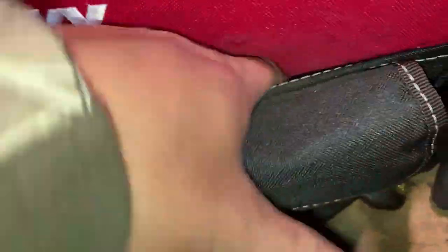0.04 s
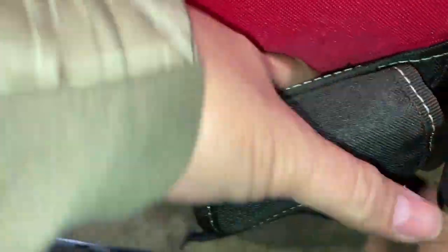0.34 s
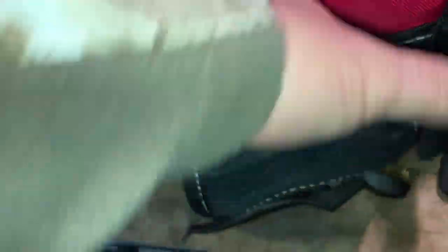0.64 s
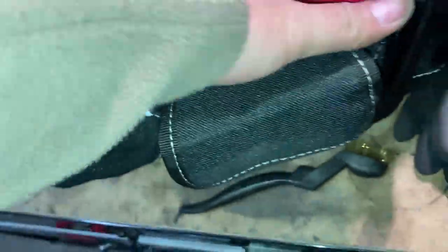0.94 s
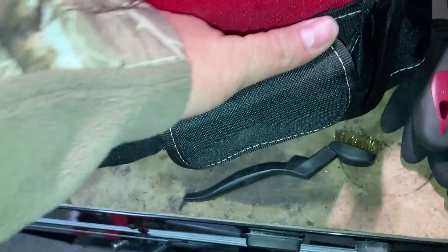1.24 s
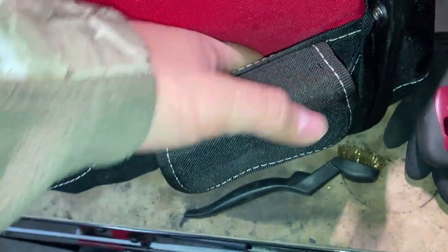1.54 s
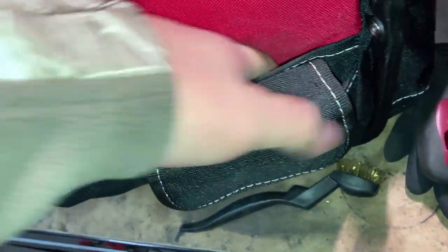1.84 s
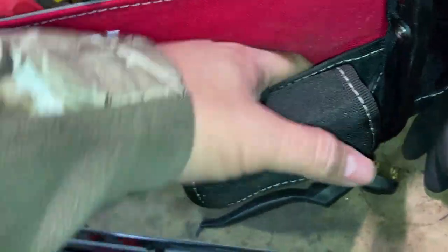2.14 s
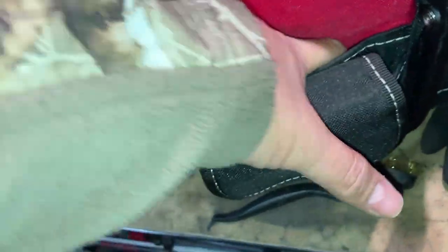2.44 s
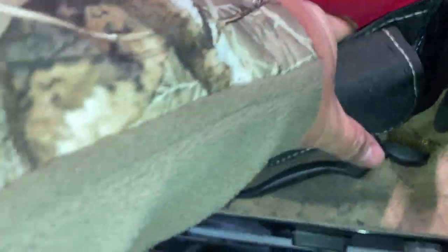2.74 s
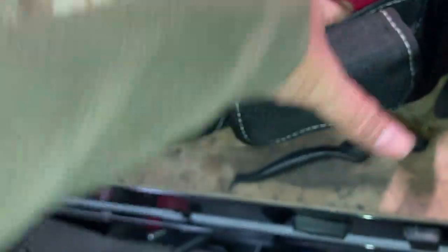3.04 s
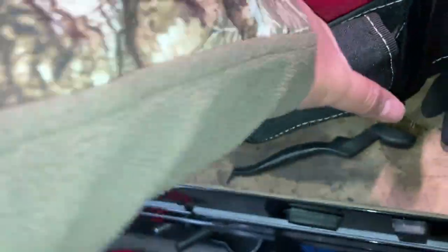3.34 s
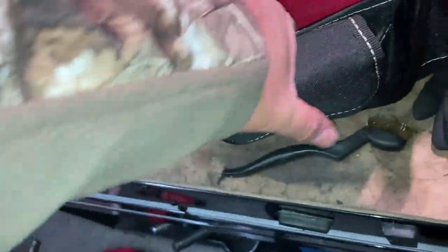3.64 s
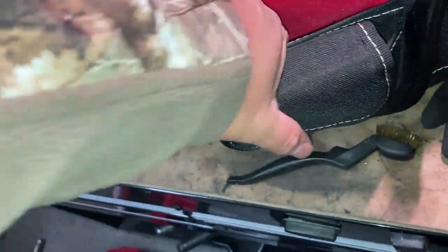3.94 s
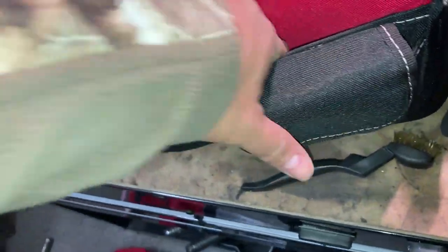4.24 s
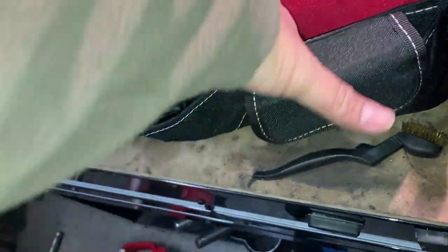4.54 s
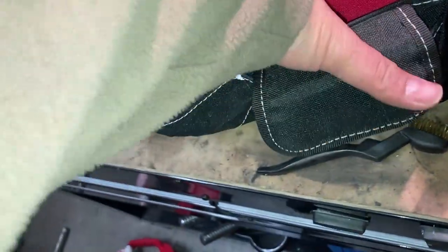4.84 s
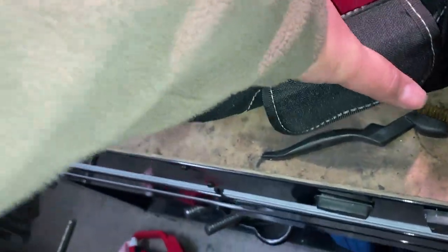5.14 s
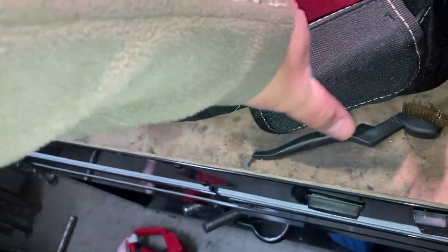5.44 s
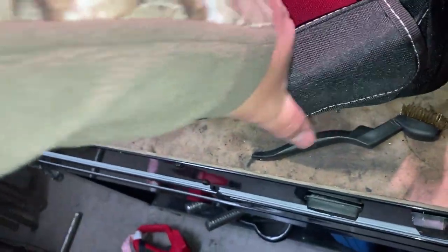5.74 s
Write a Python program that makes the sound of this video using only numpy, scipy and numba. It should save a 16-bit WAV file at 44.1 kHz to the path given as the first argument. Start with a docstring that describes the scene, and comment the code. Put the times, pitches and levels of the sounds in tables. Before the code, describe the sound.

In a quiet workshop, a hand rummages through the pocket of a stiff fabric tool bag, right by the microphone. Sleeve and fingers slide over the weave in uneven strokes, hissing and crumpling, while the pocket wall bumps softly. Tools tick faintly at first. Past the middle a handle creaks briefly, then comes a louder bump with muffled clacks and one sharp metal tick as the rustling carries on.

```python
"""A quiet workshop, close up on a stiff fabric tool bag, heard through a phone's two microphone ports.
A hand rummages in the pocket: sleeve and fingers slide over the weave, whose threads catch and hiss,
folds crumple and buckle, and the pocket wall flaps and bumps. The tools packed inside tick and clack
against each other, damped by the cloth, and once a handle creaks along the fabric."""
import sys
import numpy as np
from scipy import signal
from scipy.fft import rfft, irfft
from scipy.io import wavfile
from scipy.ndimage import uniform_filter1d
from numba import njit

SR = 44100
rng = np.random.default_rng(int(sys.argv[2]) if len(sys.argv) > 2 else 0)


def to_wav(s):
    """Save 16-bit WAV."""
    ch = np.atleast_2d(s).T  # columns
    pcm = np.round(np.clip(ch, -1, 1) * 32767)  # PCM
    wavfile.write(sys.argv[1], SR, pcm.astype(np.int16))


N = 255156
TIME = np.arange(N) / SR
FREQ = np.arange(N // 2 + 1) * SR / N


def undb(db):
    """Decibels to gain."""
    return 10 ** (np.asarray(db) / 20)


def unit(x):
    """Scale to an rms of 1."""
    return x / np.sqrt(np.mean(x ** 2))


def colour(x, points):
    """Filter by a spectrum of (freq_hz, level_db) points."""
    hz, db = np.transpose(points)
    return irfft(rfft(x) * undb(np.interp(np.log(FREQ + 1), np.log(hz), db)), N)


def around(x, hz, octaves):
    """Keep a soft band of the given half width around a frequency."""
    f = np.arange(len(x) // 2 + 1) * SR / len(x) + 1
    return irfft(rfft(x) / (1 + (np.log2(f / hz) / octaves) ** 4), len(x))


def wander(rate_hz):
    """Slow random drift with a spread near 1."""
    steps = rng.standard_normal(4096)
    return 1.2 * np.interp(TIME * rate_hz, np.arange(len(steps)), steps)


def add(track, start_s, sound):
    """Mix a short sound into a track."""
    start = max(int(start_s * SR), 0)
    track[start:start + len(sound)] += sound[:N - start]


@njit
def resonate(x, hz, width_hz):
    """Band-pass whose centre may move, gain 1 at the centre."""
    y, band_state, low_state = np.empty(len(x)), 0., 0.
    for i in range(len(x)):
        g, damping = np.tan(np.pi * hz[i] / SR), width_hz / hz[i]
        band = (band_state + g * (x[i] - low_state)) / (1 + g * (g + damping))
        band_state, low_state = 2 * band - band_state, low_state + 2 * g * band
        y[i] = damping * band
    return y


def workshop_air(level_db):
    """Room tone behind the bag: still air, a faint low rush."""
    spectrum_hz_db = [(25, -4), (55, 16), (150, 7), (500, -9), (16000, -74)]
    return unit(colour(rng.standard_normal(N), spectrum_hz_db)) * undb(level_db)


def bag_echoes(x, t60_s, level_db):
    """Bag and sleeve, right by the microphone, scatter a different short tail to each port."""
    t = TIME[:16384]
    tails = rng.standard_normal((2, len(t))) * np.exp(-np.log(1000) * t / t60_s)
    tails = tails / np.sqrt(np.sum(tails ** 2, axis=1, keepdims=True))
    return undb(level_db) * signal.fftconvolve(x[None], tails, axes=1)[:, :N]


# Phase of the left microphone port ahead of the right: freq_hz, lead_rad
PORT_PHASE = [(0, 0), (300, -.4), (700, -2.2), (1050, -3), (1400, -3), (2100, -4.1), (3300, -3.7),
              (5300, -np.pi), (8400, 0), (15000, 2 * np.pi), (22050, 13)]


def microphone_ports(x):
    """The sound reaches the two ports out of step."""
    lead = np.interp(FREQ, *np.transpose(PORT_PHASE))
    return np.array([x, irfft(rfft(x) * np.exp(-1j * lead), N)])


# Modes of a struck or scraped tool handle: pitch_hz, level_db
HANDLE_RESONANCES = [(678, -14), (810, -9), (1335, 4.5), (1540, -1), (1940, 3.5), (2220, -4.5),
                     (2540, -3.5), (2850, -1), (3450, -10)]


def handle_ring(centre_hz, t60_s, octaves):
    """The spot touched on a handle picks the modes, and the cloth chokes them."""
    ring, t = 0, TIME[:4096]
    for hz, mode_db in HANDLE_RESONANCES:
        detune, phase = rng.standard_normal(2)
        size = undb(mode_db) / (1 + (np.log2(hz / centre_hz) / octaves) ** 2)
        ring = ring + size * np.sin(2 * np.pi * (hz * (1 + .008 * detune) * t + phase))
    return ring * np.exp(-np.log(1000) * t / t60_s)


def handle_creak(peak_s, pitch_hz, swell_s, release_s, jitter, overtone_db, level_db):
    """A handle judders along the cloth: nearly regular stick and slip that builds and breaks off."""
    phase = 2 * np.pi * np.cumsum(pitch_hz * (1 + jitter * wander(250))) / SR
    judder = sum(undb(overtone_db * k) * np.sin((k + 1) * phase) for k in range(3))
    flank_s = np.where(TIME < peak_s, swell_s, release_s)
    return unit(judder) * np.exp(-((TIME - peak_s) / flank_s) ** 2) * undb(level_db)


# Handles meeting inside the pocket: start_s, relative_db, centre_hz, t60_s
HANDLE_KNOCKS = [(2.7085, -36, 690, 0.042), (2.7138, -41.5, 1300, 0.073), (2.722, -36.5, 676, 0.046),
                 (3.601, -34.5, 810, 0.062), (3.829, -33.5, 2000, 0.037), (4.1215, -29, 2370, 0.03),
                 (4.1235, -27.5, 690, 0.054), (4.1362, -22.5, 2360, 0.012), (4.226, -31, 1910, 0.07),
                 (4.2275, -41, 750, 0.026), (4.7508, -21.5, 2500, 0.0084), (4.753, -25, 725, 0.01),
                 (5.3846, -36, 3030, 0.025)]


def handle_clacks(crack_db, crack_s, gain_db):
    """Handles knock together: a dry crack, then a short ring."""
    out, t = np.zeros(N), TIME[:4096]
    for start_s, db, centre_hz, t60_s in HANDLE_KNOCKS:
        ring = handle_ring(centre_hz, t60_s, octaves=0.24)
        decay_energy = np.sum(np.exp(-2 * np.log(1000) * t / t60_s))
        ring = ring / np.sqrt(np.sum(ring ** 2) / decay_energy)
        crack = unit(around(rng.standard_normal(len(t)), centre_hz, 0.84)) * np.exp(-t / crack_s)
        add(out, start_s, (ring + undb(crack_db) * crack) * undb(db + gain_db))
    return signal.sosfilt(signal.butter(2, 400, "highpass", fs=SR, output="sos"), out)


# Brief ring of a tool wrapped in cloth: pitch_hz, level_db, t60_s
METAL_MODES = [(3170, 1, 0.008), (7240, 6.5, 0.0048), (9300, 20.5, 0.0013), (10500, 12, 0.0019),
               (14800, -6, 0.0018)]
# Tools and buckles touching, close by: start_s, relative_db, treble_tilt_db, contact_s
METAL_CONTACTS = [(1.0251, -28.5, 2, 0.00076), (1.4201, -30.5, -14, .0011), (1.954, -37, -18, .0008),
                  (2.919, -41, 10, .003), (4.1362, -23.5, -24, .0008), (4.751, -10.5, 3, 0.0002),
                  (4.751, -29, 3, 0.00024), (5.3826, -32, -24, 0.001), (5.384, -34, -20, 0.00071),
                  (5.5, -38, -22, .001)]


def metal_ticks(crack_hz, crack_db, gain_db):
    """Metal grates on metal for an instant and rings the damped modes of a tool."""
    out, t = np.zeros(N), TIME[:2048]
    for start_s, db, treble_tilt_db, contact_s in METAL_CONTACTS:
        ring = 0
        for hz, mode_db, t60_s in METAL_MODES:
            detuned_hz = hz * (1 + .015 * rng.standard_normal())
            size = undb(mode_db + treble_tilt_db * hz / (hz + 3500))
            ring = ring + size * np.sin(2 * np.pi * detuned_hz * t) * np.exp(-np.log(1000) * t / t60_s)
        crack = unit(around(rng.standard_normal(len(t)), crack_hz, 1.4)) * np.exp(-t / contact_s)
        onset_rms = np.sqrt(np.mean(ring[:30] ** 2))
        add(out, start_s, (ring / onset_rms + undb(crack_db) * crack) * undb(db + gain_db))
    return out


# Quick scrapes of a fold or seam: peak_s, level_db, half_length_s, centre_hz
SEAM_SCRAPES = [(0.862, -41.5, 0.027, 6440), (1.1544, -38, 0.0022, 7885), (1.156, -39.5, 0.0028, 1890),
                (1.324, -41.5, 0.0057, 9050), (1.325, -36.5, 0.0044, 1820), (1.59, -35.5, 0.0059, 1310),
                (1.591, -39.5, 0.01, 9500), (2.7035, -34.5, 0.0032, 2730), (2.7056, -32, 0.0024, 9000),
                (3.2, -42, 0.014, 1950), (3.207, -43, 0.028, 500), (3.274, -38, 0.0087, 2460),
                (3.612, -39, 0.017, 1950), (3.848, -46, 0.021, 645), (4.005, -38, 0.0072, 1150),
                (4.124, -34.5, 0.012, 2250)]


def seam_scuffs(ring_db, ring_t60_s):
    """A fold drags over a seam or a handle: a short swell of gritty slips that make the handle ring."""
    out, t = np.zeros(N), TIME[:4096] - 2048 / SR
    for peak_s, db, half_s, hz in SEAM_SCRAPES:
        grit = rng.laplace(size=len(t)) * np.exp(-(t / half_s) ** 2)
        ring = signal.fftconvolve(grit, handle_ring(hz, ring_t60_s, octaves=.25))[:len(t)]
        scrape = around(grit, hz, octaves=0.78) + undb(ring_db) * ring
        scrape_rms = np.sqrt(np.sum(scrape ** 2) / (half_s * SR))
        add(out, peak_s + t[0], scrape / scrape_rms * undb(db))
    return out


# Resonances of the hollow bag: pitch_hz, width_hz, level_db
BAG_RESONANCES = [(87.5, 50, 5), (137.5, 44, 8), (179.6, 25, 3.5), (253.6, 58, 6.5), (334, 95, 3.5),
                  (386, 31, 0.5), (493, 97, -5), (805, 204, 13)]
# The pocket wall, knocked or snapping back near the microphone: start_s, relative_db, pitch_hz
WALL_THUDS = [(0.045, -39, 251), (0.594, -36.5, 295), (0.893, -36.5, 195), (0.917, -40.5, 159),
              (1.162, -43, 286), (1.272, -35, 225), (1.326, -40, 320), (1.861, -41, 228), (2.005, -40, 206),
              (2.052, -34, 253), (2.075, -38, 226), (2.394, -39.5, 350), (2.715, -28, 275),
              (2.723, -38, 370), (2.74, -38.5, 164), (2.79, -48.5, 240), (2.889, -50, 211),
              (3.297, -39.5, 450), (3.417, -39, 394), (3.516, -45.5, 320), (3.606, -31.5, 320),
              (4.033, -34, 316), (4.1241, -23, 250), (4.1296, -22.5, 200), (4.14, -25, 293),
              (4.178, -40, 340), (4.222, -30.5, 440), (4.23, -26.5, 385), (4.8, -34.5, 303),
              (4.807, -34.5, 243), (5.321, -48.5, 110), (5.502, -34, 358), (5.561, -42, 163)]


def wall_bumps(contact_cycles, buckle_db, buckle_s, settle_db, settle_s, gain_db):
    """A soft blow rings the hollow bag; the wall buckles after it and rolls on as it settles."""
    out, t, lead_in = np.zeros(N), TIME[:8192], 512
    bag = sum(undb(db) * width * np.exp(-np.pi * width * t) * np.cos(2 * np.pi * hz * t)
              for hz, width, db in BAG_RESONANCES)
    aftershake = undb(buckle_db) * np.exp(-t / buckle_s) + undb(settle_db) * np.exp(-t / settle_s)
    for start_s, db, hz in WALL_THUDS:
        blow = np.exp(-t * hz / contact_cycles)
        push = blow / blow.sum() + aftershake * rng.standard_normal(len(t))
        boom = signal.fftconvolve(push, bag)[:len(t)]
        thud = around(np.pad(boom, (lead_in, 0)), hz, octaves=0.85)
        loudest_rms = np.sqrt(uniform_filter1d(thud ** 2, size=260).max())
        add(out, start_s - lead_in / SR, thud / loudest_rms * undb(db + gain_db))
    return out


def slips(per_s, spread_db):
    """Threads catch and let go: tiny impulses of uneven size at random moments."""
    caught = rng.random(N) < per_s / SR
    return caught * rng.standard_normal(N) * undb(spread_db * np.minimum(rng.exponential(size=N), 4))


def rubbing(grains, level_db, flutter_db, flutter_hz):
    """The grip of the hand keeps changing, so the rubbing flutters about its level."""
    return unit(grains * undb(flutter_db * wander(flutter_hz))) * undb(level_db)


# Hollows between the folds: pitch_hz
HOLLOW_PITCHES = [396, 540, 700, 918, 1163, 1327, 1662, 1937, 2296, 2560, 2900, 3450]


def fold_hollows(x, width_hz, drift, swing_db, direct_db):
    """Folds open and close: their resonances wander in pitch and take turns, at an even total level."""
    rings = sum(resonate(x, hz * np.exp(drift * wander(9)), width_hz) * undb(swing_db * wander(18))
                for hz in HOLLOW_PITCHES)
    rings = rings + undb(direct_db) * x
    return rings / np.sqrt(uniform_filter1d(rings ** 2, size=1500) + 1e-18)


# Close-up spectra of the sliding weave, crumpling, buckling and the pocket wall: freq_hz, level_db
WEAVE_SPECTRUM = [(1500, -22), (3500, -7), (5400, -3), (6600, 0), (7700, -1.5), (8500, 0), (11000, -2),
                  (13500, -4.5), (16000, -8)]
CRUMPLE_SPECTRUM = [(500, -11), (1200, -6.5), (1550, 0), (2000, 5.5), (2500, 7), (3100, 3), (4000, 6),
                    (5500, -18), (10000, -28)]
BUCKLE_SPECTRUM = [(200, -23), (450, 5), (680, 4), (1000, 1.5), (1400, 1.5), (2200, -31), (5000, -49)]
WALL_SPECTRUM = [(25, -36), (55, 1.5), (105, -4.5), (170, 1), (215, -1), (290, 6), (400, 0.5), (520, -2),
                 (750, -6.5), (1500, -13), (4000, -50)]


def cloth(hiss_db, crumple_db, rumble_db):
    """One patch of cloth: the weave hisses, folds crumple and buckle, and the pocket wall rumbles."""
    threads = colour(slips(per_s=13000, spread_db=-1.5), WEAVE_SPECTRUM)
    snaps = slips(per_s=1000, spread_db=1.5)
    creases = fold_hollows(snaps, width_hz=72., drift=0.05, swing_db=6.5, direct_db=-8.5)
    tugs = colour(slips(per_s=3000, spread_db=0), WALL_SPECTRUM)
    hiss = rubbing(threads, hiss_db, flutter_db=1.65, flutter_hz=56)
    crumpling = rubbing(colour(creases, CRUMPLE_SPECTRUM), crumple_db, flutter_db=0.38, flutter_hz=55)
    buckle_db = (crumple_db + rumble_db) / 2 - 6
    buckling = rubbing(colour(creases, BUCKLE_SPECTRUM), buckle_db, flutter_db=3.5, flutter_hz=60)
    rumble = rubbing(tugs, rumble_db, flutter_db=2.4, flutter_hz=50)
    return hiss + crumpling + buckling + rumble


# Strokes through the pocket, right at the microphone; light ones hiss, hard ones crumple the cloth:
# fastest_s, swell_s, release_s, hiss_db, crumple_db, rumble_db
HAND_STROKES = [(0.035, 0.16, 0.042, -42.5, -48.5, -51), (0.215, 0.1, 0.063, -49.5, -53, -54),
                (0.38, 0.05, 0.035, -55.5, -56.5, -64), (0.635, 0.17, 0.11, -46.5, -50.5, -50.5),
                (0.77, 0.11, 0.06, -45, -49, -56), (0.872, 0.042, 0.032, -38, -45, -57),
                (1.04, 0.056, 0.082, -51, -55.5, -64), (1.2, 0.15, 0.13, -48.5, -51.5, -59),
                (1.324, 0.02, 0.054, -65, -55, -50.5), (1.465, 0.047, 0.035, -48.5, -49.5, -51),
                (1.588, 0.075, 0.061, -43.5, -47, -52), (1.845, 0.071, 0.064, -41.5, -48.5, -49.5),
                (1.98, 0.078, 0.078, -55, -61, -48.5), (2.074, 0.044, 0.059, -44, -52, -54.5),
                (2.21, 0.069, 0.076, -49.5, -53.5, -51), (2.403, 0.032, 0.093, -49, -49.5, -49),
                (2.705, 0.041, 0.036, -48.5, -52, -56), (2.92, 0.077, .04, -48.5, -62, -75),
                (2.999, 0.035, 0.019, -49, -53, -50.5), (3.12, 0.1, 0.09, -46, -50.5, -51.5),
                (3.197, 0.03, 0.036, -44, -44.5, -45), (3.279, 0.041, 0.097, -52.5, -51, -45),
                (3.41, 0.018, 0.04, -51.5, -51, -49), (3.49, 0.048, 0.024, -49, -53.5, -53.5),
                (3.608, 0.057, 0.08, -45, -52, -50), (4.0, 0.069, 0.058, -45.5, -53.5, -50),
                (4.131, 0.024, 0.012, -41.5, -42.5, -34.5), (4.234, 0.087, 0.092, -45, -47, -45),
                (4.48, 0.14, 0.12, -48, -49.5, -56), (4.62, 0.064, 0.077, -65, -70, -50.5),
                (4.79, 0.071, 0.048, -43.5, -46, -47.5), (4.95, 0.073, 0.029, -54.5, -60.5, -57),
                (5.035, 0.051, 0.094, -52.5, -48.5, -48), (5.225, 0.094, 0.06, -47, -51, -47),
                (5.411, 0.033, 0.067, -51, -53.5, -45), (5.515, 0.023, 0.022, -52, -54, -51),
                (5.679, 0.1, 0.023, -62, -55.5, -49.5), (5.77, 0.13, 0.059, -48, -59, -55)]
# Brief halts of the arm: centre_s, half_length_s, dip_db
ARM_HALTS = [(1.937, 0.013, -7), (2.326, 0.02, -3.5), (2.801, 0.035, -7.5), (2.891, 0.091, -11),
             (3.762, 0.025, -7), (3.88, 0.012, -5), (4.885, 0.029, -5), (5.602, 0.019, -4)]


def hand_levels(lean_db, swell_shape, release_shape):
    """Hiss, crumpling and rumble in dB: strokes rise over the arm's steady lean, and halts dip it all."""
    power = undb(np.array(lean_db)[:, None]) ** 2
    for fastest_s, swell_s, release_s, *layers_db in HAND_STROKES:
        gap_s = np.abs(TIME - fastest_s)
        swell = (gap_s / swell_s) ** swell_shape  # a shape of 1 is a cusp, 2 a bell
        release = (gap_s / release_s) ** release_shape
        speed = np.exp(-np.minimum(np.where(TIME < fastest_s, swell, release), 20))
        power = power + np.outer(undb(layers_db), speed) ** 2
    halts_db = sum(db * np.exp(-((TIME - centre_s) / half_s) ** 4) for centre_s, half_s, db in ARM_HALTS)
    return 10 * np.log10(power) + halts_db


def scene():
    """Cloth and tools close in front of the phone; folds off to the sides reach each port separately."""
    hiss_db, crumple_db, rumble_db = hand_levels((-60.5, -61, -59), swell_shape=1.89, release_shape=1.67)
    knocks = wall_bumps(contact_cycles=0.084, buckle_db=-27.5, buckle_s=0.0097,
                        settle_db=-39, settle_s=0.028, gain_db=-1)
    knocks += seam_scuffs(ring_db=-32, ring_t60_s=0.028)
    knocks += metal_ticks(crack_hz=10000, crack_db=-6, gain_db=-4.5)
    knocks += handle_clacks(crack_db=-3.5, crack_s=0.0015, gain_db=1)
    knocks += handle_creak(peak_s=3.6, pitch_hz=503, swell_s=0.023, release_s=0.013,
                           jitter=0.05, overtone_db=-5.5, level_db=-32.5)
    front = cloth(hiss_db, crumple_db, rumble_db) + knocks
    sides = np.array([cloth(hiss_db - 14, crumple_db - 2.5, rumble_db - 7) for _ in range(2)])
    air = workshop_air(level_db=-65)
    echoes = bag_echoes(knocks, t60_s=0.074, level_db=-10)
    return microphone_ports(front + air) + sides + echoes


def record(dry):
    """The phone cuts the treble above 15.9 kHz."""
    return signal.sosfilt(signal.ellip(10, .2, 80, 15900, fs=SR, output="sos"), dry)


dry = scene()
out = record(dry)
to_wav(out)
```